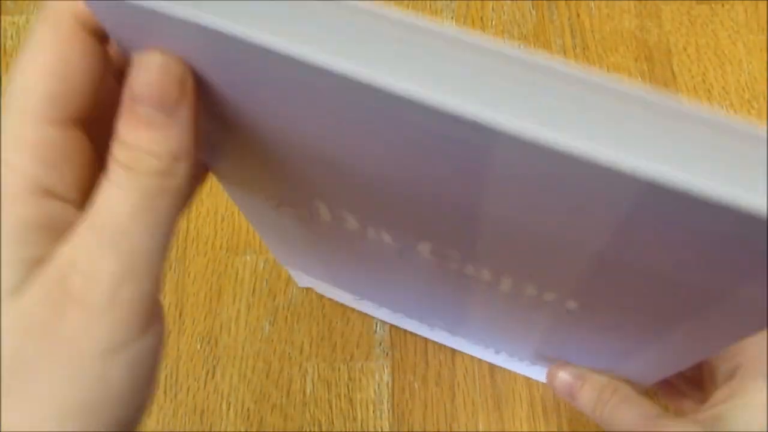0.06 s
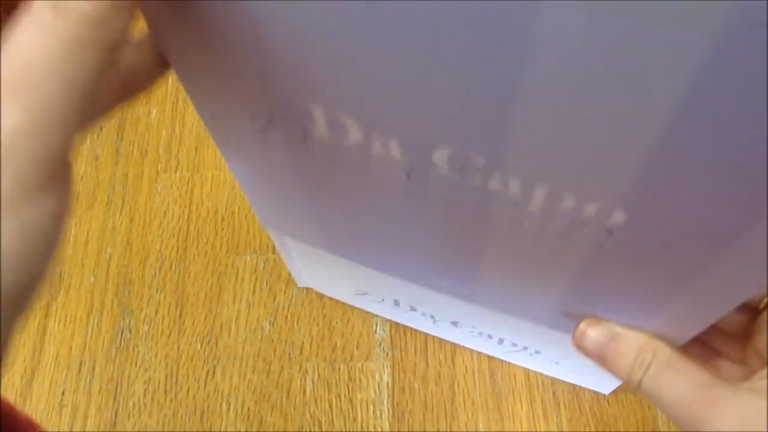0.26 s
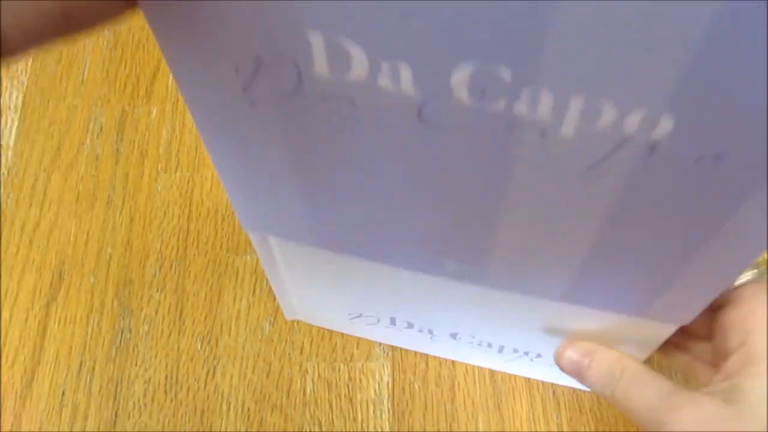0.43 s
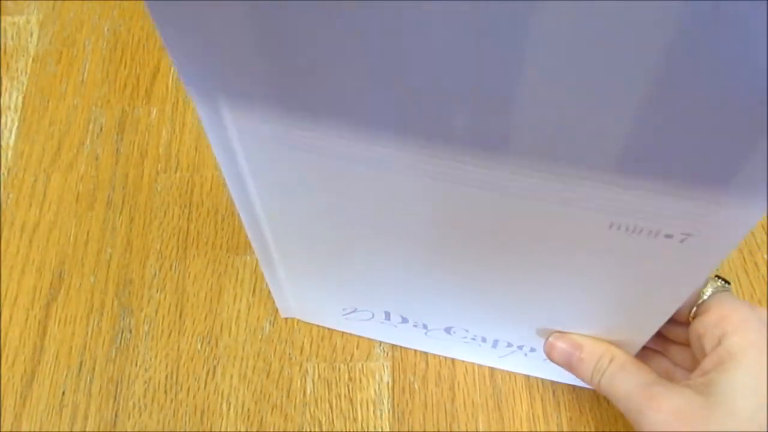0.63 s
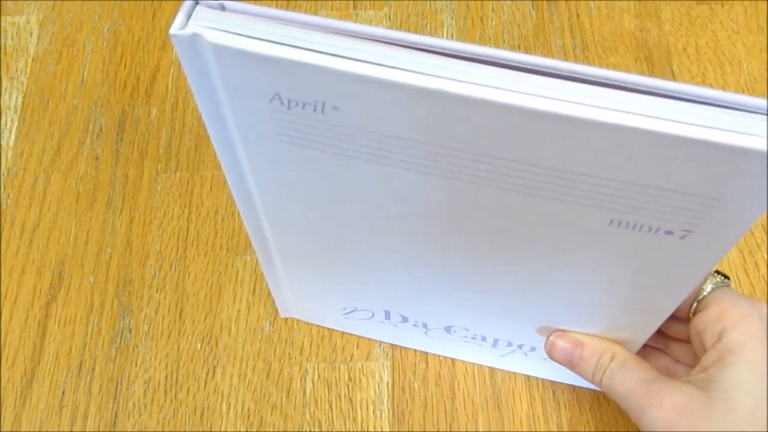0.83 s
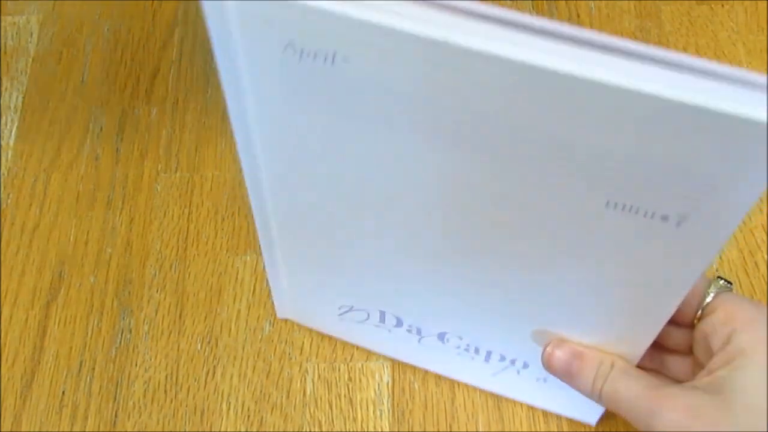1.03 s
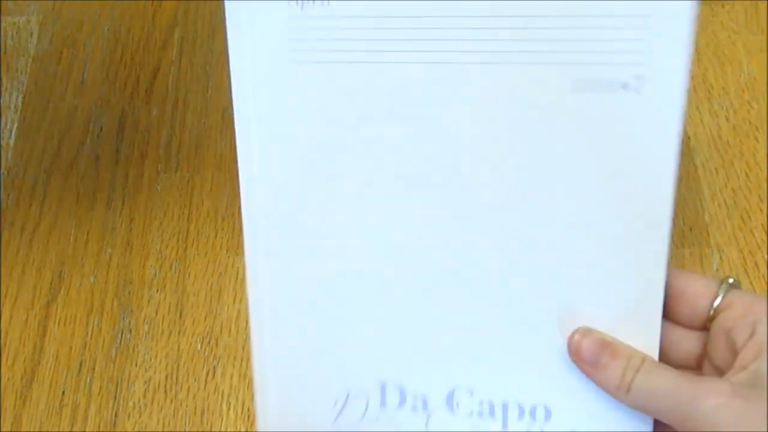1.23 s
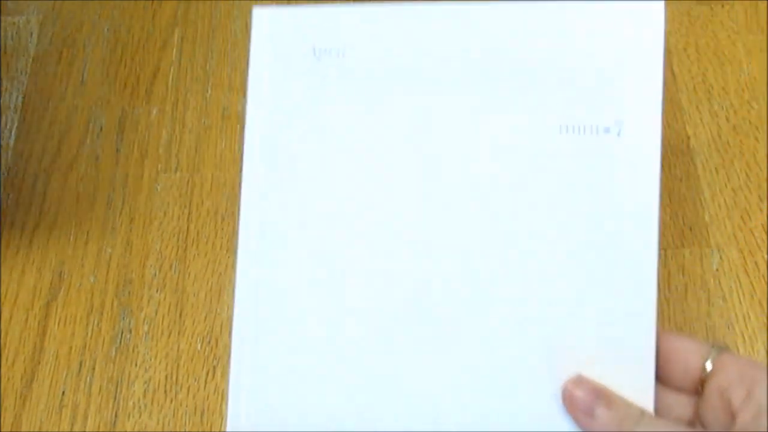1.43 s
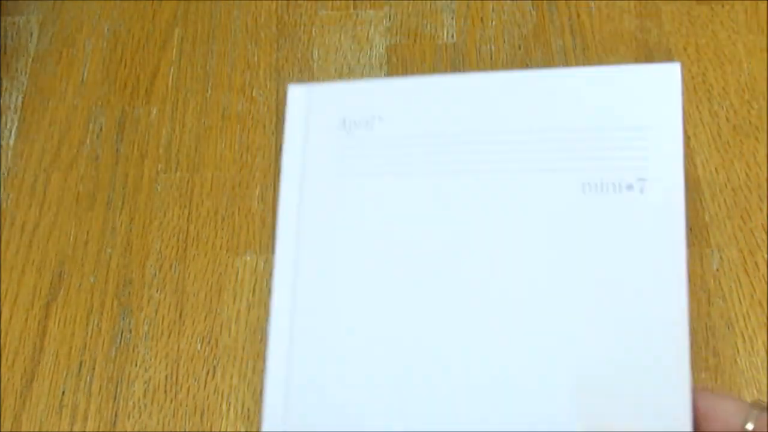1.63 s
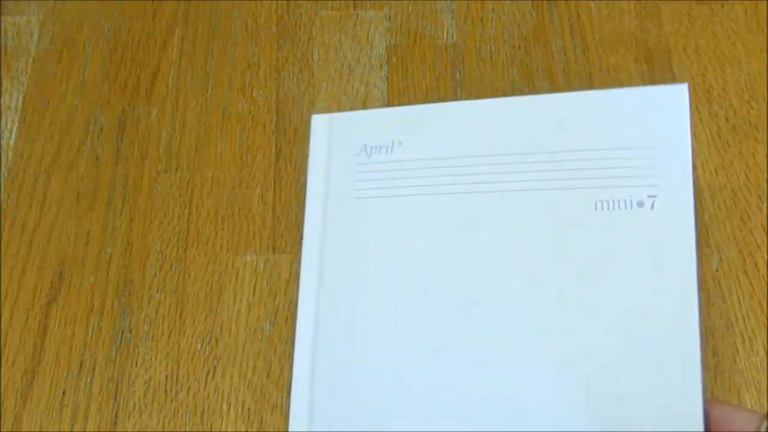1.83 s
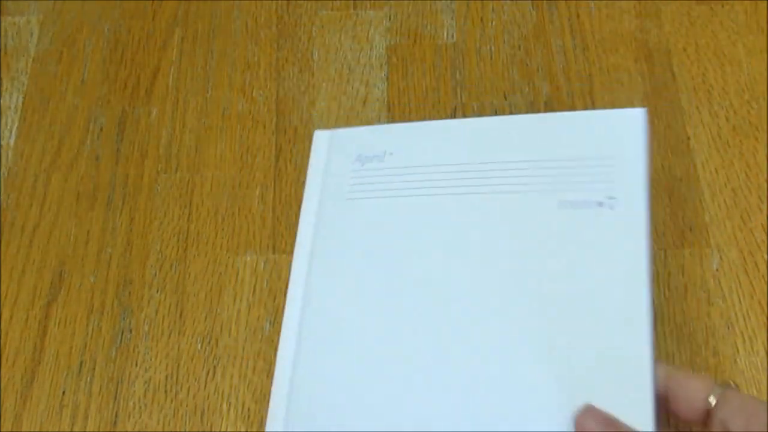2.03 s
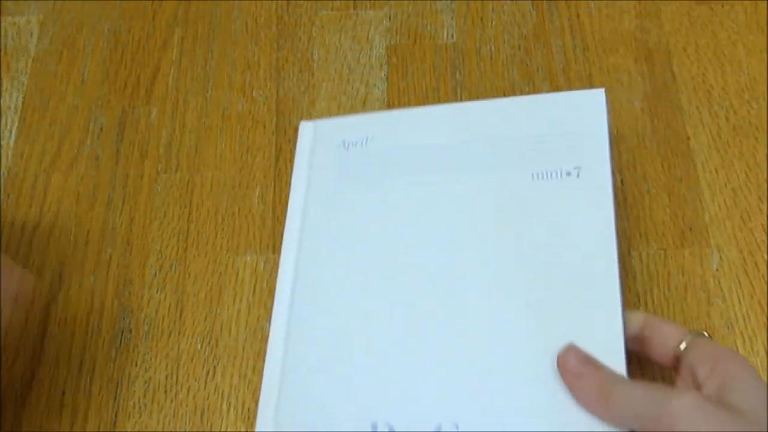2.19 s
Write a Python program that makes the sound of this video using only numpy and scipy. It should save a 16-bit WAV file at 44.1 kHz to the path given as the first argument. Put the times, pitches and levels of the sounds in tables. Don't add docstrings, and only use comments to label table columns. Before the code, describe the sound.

A stiff card sleeve scrapes off a hardcover book, a short pull then a longer rising one, followed by light finger taps and a bright clatter as it drops; close microphone, small quiet room.

```python
import sys
import numpy as np
from scipy import signal
from scipy.fft import rfft, irfft, next_fast_len
from scipy.io import wavfile
from scipy.ndimage import uniform_filter1d, map_coordinates

SR = 44100
rng = np.random.default_rng(int(sys.argv[2]) if len(sys.argv) > 2 else 0)


def master_out(mix):
    frames = np.transpose(np.atleast_2d(mix))
    ceiling = np.clip(frames, -1, 1)
    pcm = np.round(ceiling * 32767).astype(np.int16)
    wavfile.write(sys.argv[1], SR, pcm)


def linear_from_db(decibels):
    return 10 ** (np.asarray(decibels, float) / 20)


N = 99533


def unit(x):
    return x / np.sqrt(np.mean(x ** 2) + 1e-20)


def along(points, hz):
    f, value = np.transpose(points)
    return np.interp(np.log(hz + 1), np.log(f + 1), value)


def filtered(x, response):
    n = x.shape[-1]
    padded = next_fast_len(n + 8192)
    spectrum = rfft(x, padded) * response(np.fft.rfftfreq(padded, 1 / SR))
    return irfft(spectrum, padded)[..., :n]


def peaks(resonances):
    def response(f):
        total = 0
        for k, (centre, width, db) in enumerate(resonances):
            damping = 1j * f * width
            total = total + (-1) ** k * linear_from_db(db) * damping / (centre * centre - f * f + damping)
        return total
    return response


def soft(contact_hz):
    return lambda f: 1 / (1 + 1j * f / contact_hz) ** 2


def wobble(rate):
    knots = rng.standard_normal(int(N * rate / SR) + 4)
    return map_coordinates(knots, [np.arange(N) * rate / SR])


def swell(t, s, rise, fall):
    return np.exp(-((t - s) / np.where(t < s, rise, fall)) ** 2)


def pan(db):
    return linear_from_db([[db], [-db]])


def add(track, s, sound):
    i = round(s * SR)
    sound = sound[max(-i, 0):][:N - max(i, 0)]
    track[max(i, 0):][:len(sound)] += sound


def dying(t60s, size, stretch=1, channels=1):
    hz, t, z = signal.stft(rng.standard_normal((channels, size)), SR, nperseg=128)
    decay = linear_from_db(-60 * t / (stretch * along(t60s, hz)[:, None]))
    return signal.istft(z * decay, SR, nperseg=128)[1][:, :size]


def ring(modes, stretch, t, spot_hz, octaves, blur_hz):
    push_db, push_cycles, scatter_db = 2, 1, 1.5
    push = np.exp(-((t * spot_hz - .75) / push_cycles) ** 2)
    out = linear_from_db(push_db) * push * np.sin(2 * np.pi * spot_hz * t)
    for hz, db, t60 in modes:
        drift = np.sqrt(2 * np.pi * blur_hz / SR) * np.cumsum(rng.standard_normal(len(t)))
        distance = np.log2(hz / spot_hz) / octaves
        level_db = db + scatter_db * rng.normal() - 3.9 * distance ** 2
        out += linear_from_db(level_db - 60 * t / (t60 * stretch)) * np.sin(2 * np.pi * hz * t + drift)
    return out


def stereo(alike, response, grains=False):
    grains_per_s, grain_db, grain_share, top_hz = 6100, -1.5, 0.23, 15900
    pair = rng.standard_normal((2, N))
    if grains:
        grit = (rng.random(N) < grains_per_s / SR) * linear_from_db(grain_db * rng.standard_normal(N))
        pair = pair * (1 - grain_share + grain_share * unit(grit))

    def split(hz):
        turn = np.arccos(np.clip(along(alike, hz), -1, 1)) / 2
        return (hz < top_hz) * response(hz) * np.array([np.cos(turn), np.sin(turn)])

    mid, side = filtered(pair, split)
    return unit(np.array([mid + side, mid - side]))


def slide():
    # t/s, rubbing level/dB, deep ring over it/dB, bright ring over it/dB
    pulls = [
        [(.0, -55.5, -12, -25), (.055, -61.5, -3.5, 0), (.105, -42.5, -13, -9), (.262, -38.5, -21, -39),
         (.33, -40.5, -9.5, -9), (.385, -49.5, -3, -20)],
        [(.398, -42, -17, -12), (.5, -36.5, -12, -18), (.608, -32, -12, -7.5), (.67, -28, -6.5, -8.5),
         (.697, -30.5, -2.5, 3.5), (.719, -35, 5, 9.5), (.735, -49.5, 7.5, 1.5), (.88, -73, 14, 8)],
    ]
    # f/Hz, level/dB per Hz
    paper_colour = [(290, -36), (500, -11), (640, -15), (974, -10.5), (3700, -5.5), (10100, -11),
                    (16000, -24.5)]
    # f/Hz, width/Hz, level/dB
    deep_hollow = [(660, 75, 1), (1006, 106, 3.5), (1400, 220, 1)]
    bright_hollow = [(1723, 51, 4.5), (2330, 190, 1), (2730, 220, 0.5), (3470, 170, -5.5),
                     (4730, 140, -10.5)]
    # f/Hz, likeness from -1 to 1
    near_alike = [(60, 0.99), (240, 0.49), (950, 1), (3770, 1), (15000, 0.74)]
    s, *levels = np.concatenate(pulls).T
    t = np.arange(N) / SR
    rub_db, deep_db, bright_db = [np.interp(t, s, v) for v in levels]
    paper = stereo(near_alike, lambda f: linear_from_db(along(paper_colour, f)), grains=True)
    paper = paper * linear_from_db(0.87 + 0.72 * wobble(42.6))
    deep = stereo(near_alike, peaks(deep_hollow), grains=True)
    deep = deep * linear_from_db(deep_db - 4.5 + 3.9 * wobble(40.3))
    bright = stereo(near_alike, np.ones_like, grains=True)
    bright = bright * linear_from_db(bright_db + 16 + 0.89 * wobble(90.6))
    rub = linear_from_db(rub_db) * (t < s[-1])
    return (rub * (paper + deep) + filtered(rub * bright, peaks(bright_hollow))) * pan(-0.55)


def singing():
    # t of peak/s, rise/s, fall/s, level/dB, f/Hz
    bands = [(.15, 0.027, 0.046, -49, 1405), (.29, 0.029, 0.081, -46.5, 3330),
             (0.249, 0.03, .05, -45, 6440), (.58, 0.05, 0.077, -42.5, 1030), (.6, 0.073, .04, -43, 4680),
             (.64, 0.1, 0.065, -40, 8000), (.665, 0.018, .015, -37, 2690), (.672, .03, 0.036, -34.5, 3420),
             (.682, 0.084, 0.034, -36, 4870), (.697, 0.031, 0.017, -29.5, 1662),
             (0.721, 0.0064, .012, -27.5, 2440), (.74, 0.017, 0.069, -43.5, 1760),
             (1.54, 0.013, 0.049, -66.5, 2520), (0.713, 0.0093, 0.011, -29, 2350),
             (.735, 0.019, .03, -37, 241.4), (.812, 0.0091, .01, -54.5, 795),
             (1.835, 0.014, .04, -31.5, 2230), (1.84, 0.0091, 0.028, -36.5, 1623),
             (.92, .005, 0.0087, -52.5, 1680), (2.06, .012, 0.036, -50, 611)]
    t, out = np.arange(N) / SR, np.zeros(N)
    for s, rise, fall, db, hz in bands:
        tone = filtered(rng.standard_normal(N), peaks([(hz, .05 * hz, 0)]))
        out += linear_from_db(db) * swell(t, s, rise, fall) * unit(tone)
    return out


def sleeve():
    # t/s, level/dB, contact f/Hz, favoured f/Hz, share of the full ring time
    knocks = [(1.621, -28, 2300, 746, 0.93), (1.7405, -18, 4940, 3340, 0.79), (1.764, -43, 1530, 515, 0.46),
              (1.7972, -18, 5860, 604, 0.62), (1.8143, -13, 3300, 1890, 0.9),
              (1.871, -33.5, 2480, 1080, 0.79), (1.828, -28, 3000, 2300, 0.44),
              (1.894, -28.5, 2000, 1000, 0.64)]
    # f/Hz, level/dB, time to fall 60 dB/s
    card = [(495.5, 3, 0.26), (755, -14, 0.29), (890, 3.5, 0.074), (1008, -5, 0.81), (1040, -2, 0.18),
            (1104, -11, 1), (1340, -23, .2), (1721, -8.5, 0.54), (1804, 0, 0.12), (2100, -19, 0.059),
            (2300, -4.5, 0.39), (2950, -4.5, 0.2)]
    # f/Hz, time to fall 60 dB/s
    rattle_t60 = [(300, 0.34), (1000, 0.51), (3000, 0.54), (8000, 0.33), (15000, 0.13)]
    # f/Hz, level/dB
    rattle_colour = [(150, 2), (400, 10), (1500, 1), (5000, 1), (15000, -0.5)]
    rattle_db, crack_db, crack_t60, rise_s = -4.5, 9, 0.0082, 0.00031
    out, t = np.zeros(N), np.arange(SR // 2) / SR
    for s, db, contact_hz, spot_hz, share in knocks:
        crack = linear_from_db(crack_db - 60 * t / crack_t60) * rng.standard_normal(len(t))
        rattle = dying(rattle_t60, len(t), share)[0]
        rattle = linear_from_db(rattle_db) * filtered(rattle, lambda f: linear_from_db(along(rattle_colour, f)))
        noise = filtered(3 * (crack + rattle), soft(contact_hz))
        notes = ring(card, share, t, spot_hz, octaves=0.59, blur_hz=23)
        add(out, s, linear_from_db(db - 9.0) * (1 - np.exp(-t / rise_s)) * (notes + noise))
    return out


def snaps():
    # t/s, level/dB, f/Hz, time to fall 60 dB/s
    cracks = [(0.84, -49, 9900, 0.0055), (1.0152, -39, 10400, 0.0068), (1.0225, -33.5, 8300, 0.008),
              (1.036, -38, 9140, 0.0069), (1.438, -50, 8600, 0.0042), (1.7456, -15, 7800, 0.0048),
              (1.763, -24.5, 8400, 0.0076), (1.7967, -27, 6900, 0.022), (2.182, -46.5, 6300, 0.048),
              (2.139, -47, 12000, 0.005), (1.0075, -49, 8500, 0.0054), (1.0165, -40, 13000, .004),
              (1.03, -55, 9000, .008), (1.046, -50, 8800, .006), (1.8152, -8.5, 2500, .006),
              (1.7456, -14, 10200, 0.0045), (1.8, -37, 4500, .008), (1.7978, -25, 4500, .006)]
    out, t = np.zeros((2, N)), np.arange(SR // 20) / SR
    for s, db, hz, t60 in cracks:
        envelope = linear_from_db(-60 * t / t60) * (1 - np.exp(-t / 0.00033))
        shared, difference = rng.standard_normal((2, len(t))) * envelope
        resonance = peaks([(hz, 0.46 * hz, 0)])
        for ear, sign in zip(out, (1, -1)):
            burst = filtered(shared + sign * 0.52 * difference, lambda f: resonance(f) ** 2)
            add(ear, s, linear_from_db(db + 11.0) * burst)
    return out


def taps():
    # t/s, level/dB, f/Hz, time to fall 60 dB/s
    touches = [(.399, -37.5, 1480, 0.033), (.8955, -35, 2039, 0.0085), (0.84, -39.5, 1900, .005),
               (0.84, -43, 1700, .005), (.935, -29, 2100, 0.0047), (.9352, -45.5, 3470, .009),
               (1.31, -45, 505, 0.082), (1.4566, -42, 1870, 0.045), (1.4564, -32.5, 1095, 0.028),
               (1.4565, -27.5, 555, 0.037), (1.4566, -46, 2580, .02), (1.3, -49, 4100, .015),
               (1.461, -46, 4580, 0.013), (1.6205, -30.5, 1340, 0.066), (1.6215, -23.5, 810, 0.021),
               (1.6224, -30, 2300, 0.01), (1.743, -23.5, 2530, .03), (1.747, -33, 2946, 0.091),
               (1.762, -25, 493, 0.15), (1.798, -24, 1737, 0.09), (1.8143, -6.5, 2065, 0.011),
               (1.8158, -8.5, 1020, 0.032), (1.822, -13.5, 1050, 0.045), (1.8275, -8.5, 1070, .03),
               (1.849, -18, 1053, 0.032), (1.87, -20, 1060, 0.056), (1.872, -27, 2300, .02),
               (1.894, -21, 994, 0.072), (2.046, -26.5, 700, 0.026), (2.057, -36, 890, .035),
               (2.07, -38, 828, .08), (2.098, -36.5, 723, 0.043), (2.125, -33, 1460, .007)]
    blur_hz, rise_cycles = 40.2, 0.33
    out, t = np.zeros(N), np.arange(SR // 8) / SR
    for s, db, hz, t60 in touches:
        drift = uniform_filter1d(np.cumsum(rng.standard_normal(len(t))), size=30)
        drift = np.sqrt(2 * np.pi * blur_hz / SR) * drift
        envelope = linear_from_db(db - 60 * t / t60) * (1 - np.exp(-t * hz / rise_cycles))
        add(out, s, envelope * np.sin(2 * np.pi * hz * t + drift))
    return out


def fingers():
    # t of peak/s, rise/s, fall/s, level/dB, brightest f/Hz
    rubs = [(1.131, 0.028, 0.07, -43, 10600), (1.14, 0.05, 0.039, -51, 1130),
            (1.278, 0.029, 0.092, -56.5, 3500), (2.08, 0.073, 0.062, -51.5, 2310),
            (1.67, 0.064, 0.18, -54, 2700), (2.211, 0.034, .06, -57, 5000)]
    # f/Hz, likeness from -1 to 1
    skin_alike = [(60, 0.63), (950, 1), (15000, 0.78)]
    t, out = np.arange(N) / SR, np.zeros((2, N))
    for s, rise, fall, db, hz in rubs:
        skin = stereo(skin_alike, peaks([(hz, 1.17 * hz, 0)]), grains=True)
        out += linear_from_db(db) * swell(t, s, rise, fall) * skin
    return linear_from_db(1.76 * wobble(57)) * out


def table():
    # t/s, level/dB, favoured f/Hz
    thuds = [(-.006, -28.5, 196), (.004, -22, 210), (.014, -25, 245), (0.068, -32, 90),
             (0.251, -42.5, 113.5), (0.452, -43, 76.4), (0.564, -39, 91), (0.7237, -37.5, 230),
             (0.735, -37, 62), (0.804, -48.5, 280), (0.896, -49.5, 260), (0.936, -51, 250), (1.13, -44, 71),
             (1.624, -40.5, 171), (1.661, -38, 350), (1.7412, -32.5, 170), (1.7971, -32, 314),
             (1.805, -31.5, 91), (2.1812, -26.5, 301), (2.2, -39.5, 250), (2.219, -39.5, 199),
             (.042, -33.5, 280), (.091, -32.5, 203), (.134, -39.5, 169), (0.9174, -51, 250),
             (0.9216, -45, 217)]
    # f/Hz, level/dB, time to fall 60 dB/s
    wood = [(62, -46, 0.19), (86, -4.5, 0.36), (149.2, -5, 0.18), (193.5, -4.5, 0.32), (250, -5, 0.26),
            (290.4, -10.5, 0.47), (350, -12, 0.26), (435, -8.5, 0.21), (540.5, -16.5, 0.49)]
    rustle_db, rustle_hz, rustle_t60, rise_cycles = -6.5, 460, 0.16, 0.065
    out, t = np.zeros(N), np.arange(SR // 2) / SR
    for s, db, spot_hz in thuds:
        rustle = linear_from_db(rustle_db - 60 * t / rustle_t60) * rng.standard_normal(len(t))
        rustle = filtered(rustle, soft(rustle_hz * spot_hz / 250))
        notes = ring(wood, 1.0, t, spot_hz, octaves=1.44, blur_hz=7.4)
        onset = 1 - np.exp(-t * spot_hz / rise_cycles)
        add(out, s, linear_from_db(db) * onset * (6 * rustle + notes))
    return out


def room(x):
    # f/Hz, time to fall 60 dB/s
    room_t60 = [(200, 0.2), (2000, 0.13), (10000, 0.23)]
    wide_hz = 350
    mid, side = dying(room_t60, SR // 2, channels=2)
    side = filtered(side, lambda f: 1j * f / (wide_hz + 1j * f))
    tail = np.array([mid + side, mid - side])
    late = np.pad(x, (200, 0))[None]
    return signal.fftconvolve(late, tail / np.linalg.norm(tail[0]), axes=1)[:, :N]


def air():
    # f/Hz, level/dB per Hz
    air_colour = [(15, -54), (25, -12), (200, 2), (560, -8), (962, -9), (2550, -19.5), (2990, -26),
                  (13200, -35), (16000, -92.5)]
    # f/Hz, level/dB
    hum_tones = [
        (152, -57.5),
        (15700, -79),
    ]
    # f/Hz, likeness from -1 to 1
    air_alike = [(60, 1), (240, 0.58), (950, -0.27), (3770, 0.85), (15000, -0.48)]
    t, hum = np.arange(N) / SR, np.zeros(N)
    for hz, db in hum_tones:
        level = linear_from_db(db + 1 + 3.8 * wobble(11.48))
        hum += level * np.sin(2 * np.pi * hz * t + 1.2 * wobble(5.02))
    breath = linear_from_db(-50.5 + 0.33 * wobble(7.26)) * stereo(air_alike, lambda f: linear_from_db(along(air_colour, f)))
    hiss = linear_from_db(-64) * stereo(air_alike, np.ones_like)
    return breath + hum + hiss


def scene():
    near = slide() + singing() + sleeve() * pan(0.2) + snaps()
    near = near + fingers() + (table() + taps()) * pan(-0.4)
    return near + linear_from_db(-11) * room(near.mean(0)) + air()


def roll_off(x):
    return signal.sosfilt(signal.butter(12, 16980, fs=SR, output="sos"), x)


def record(dry):
    low_hz, top_hz = 47, 16600
    mix = filtered(dry, lambda hz: (hz < top_hz) * (1j * hz / (low_hz + 1j * hz)) ** 3)
    return roll_off(mix)


dry = scene()
out = record(dry)
master_out(out)
```